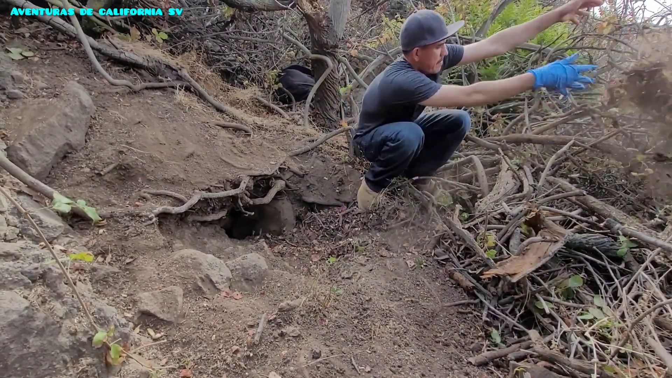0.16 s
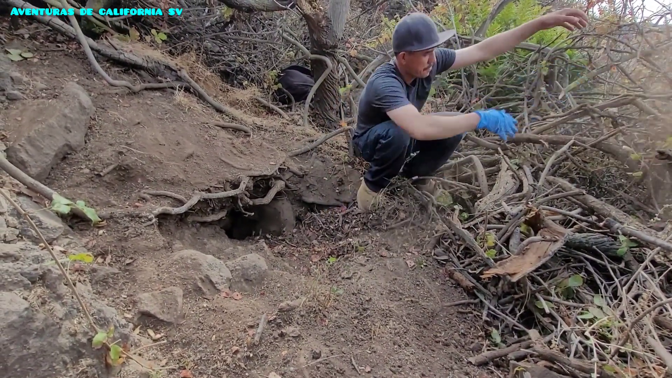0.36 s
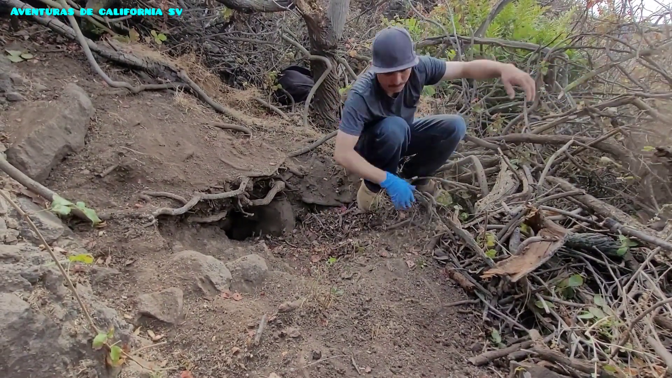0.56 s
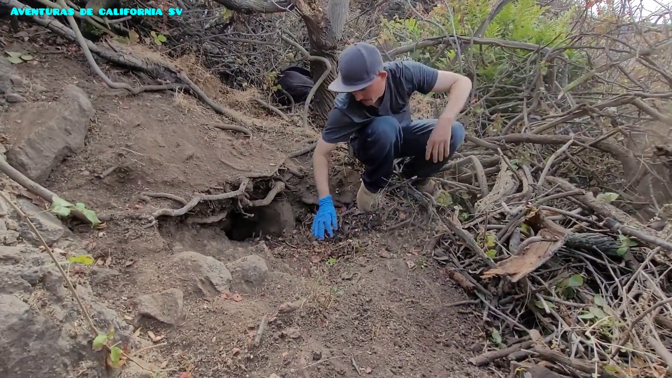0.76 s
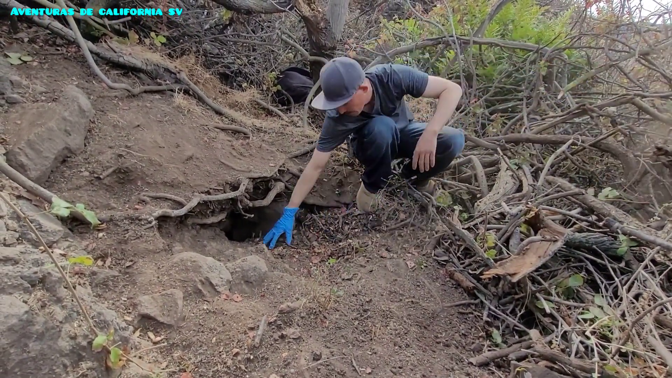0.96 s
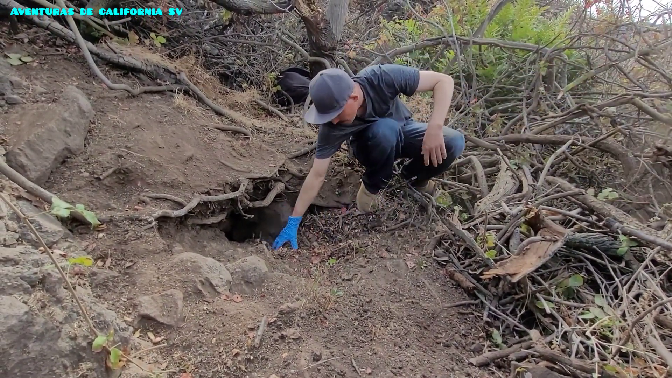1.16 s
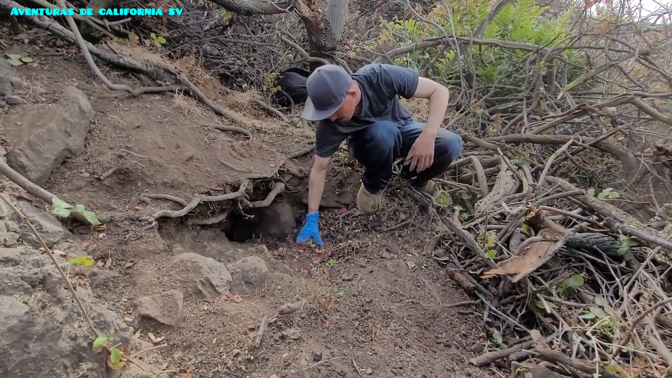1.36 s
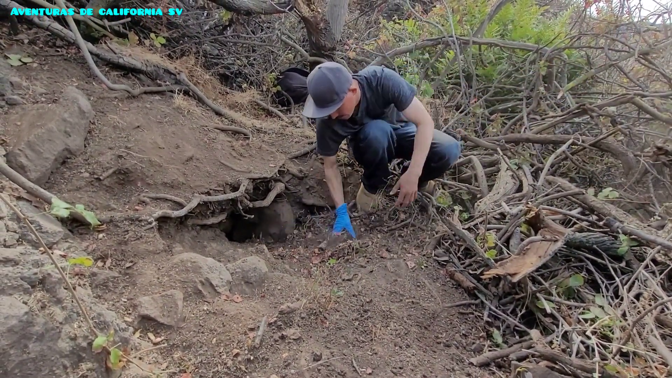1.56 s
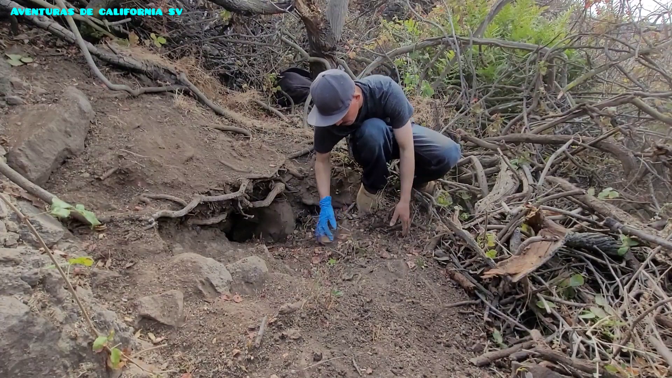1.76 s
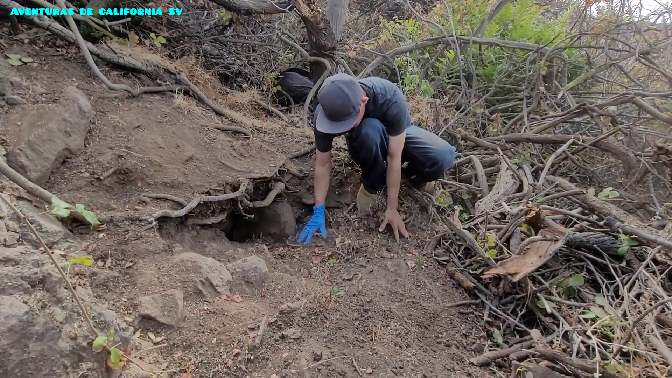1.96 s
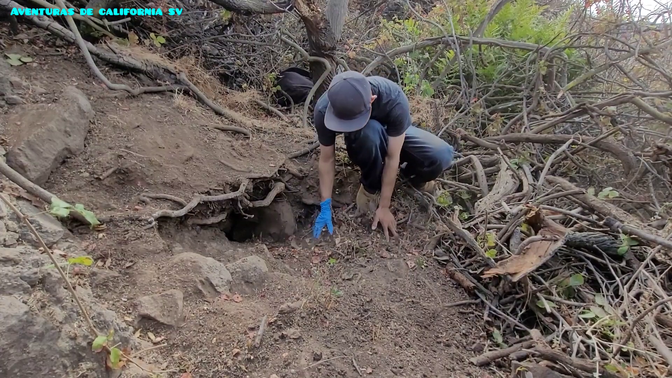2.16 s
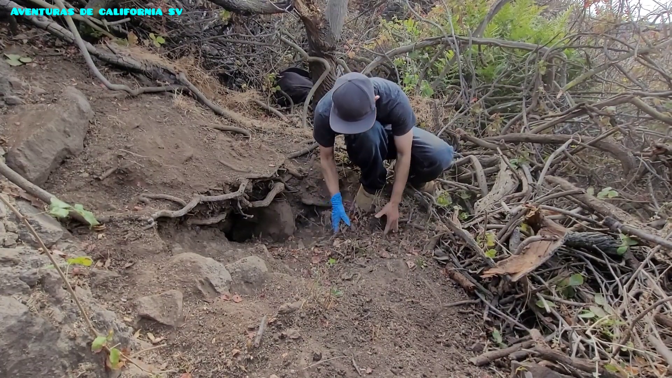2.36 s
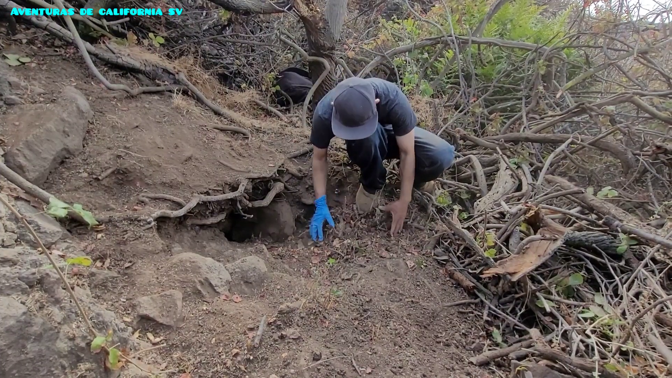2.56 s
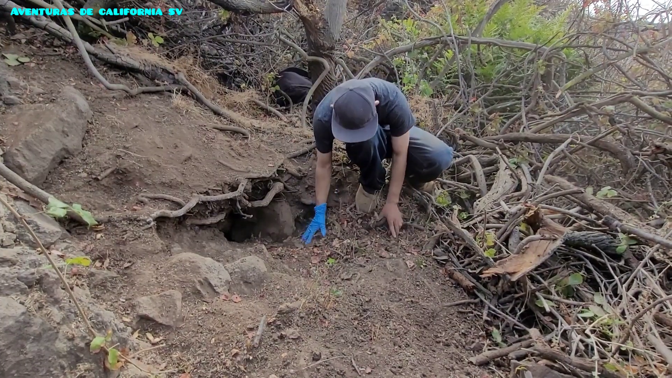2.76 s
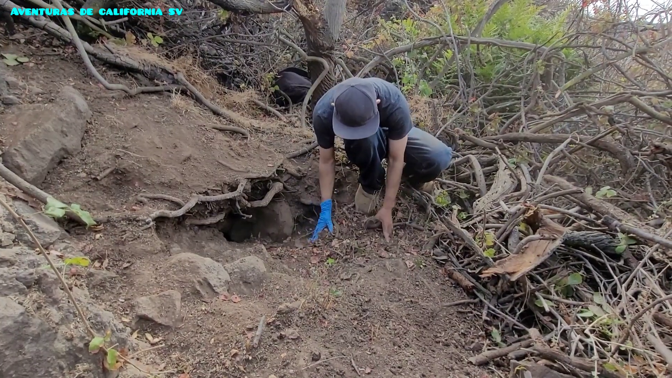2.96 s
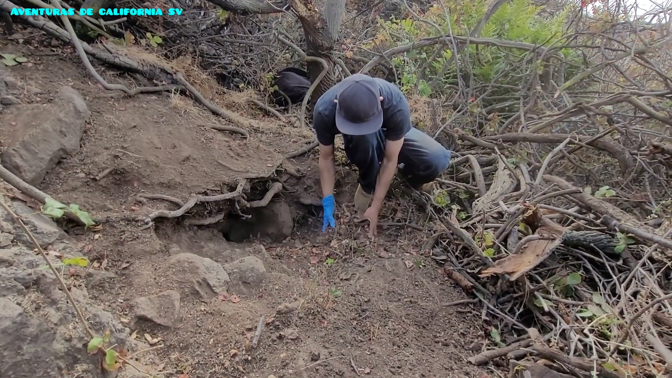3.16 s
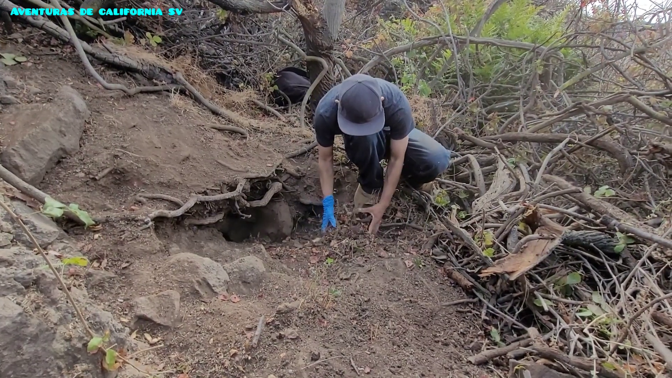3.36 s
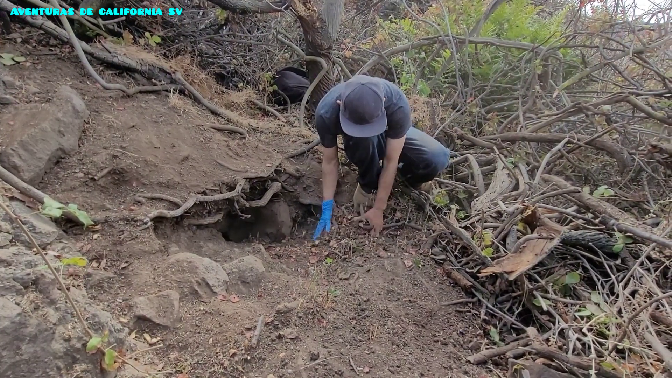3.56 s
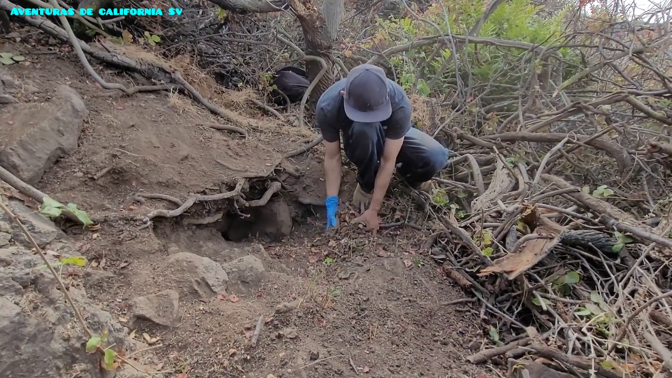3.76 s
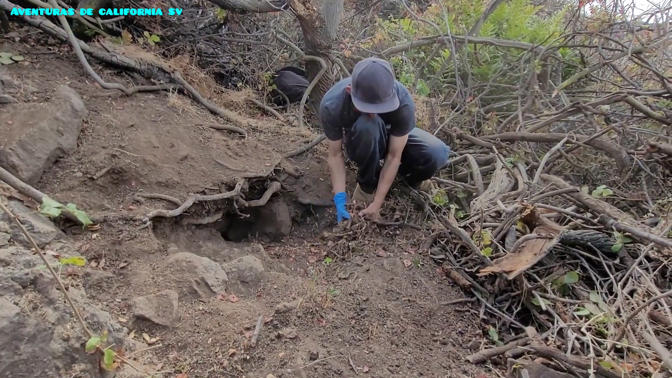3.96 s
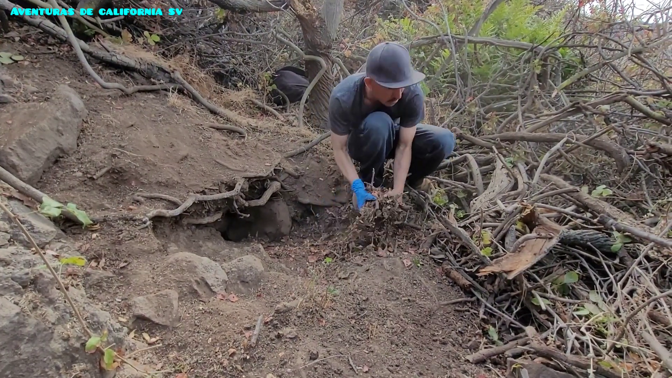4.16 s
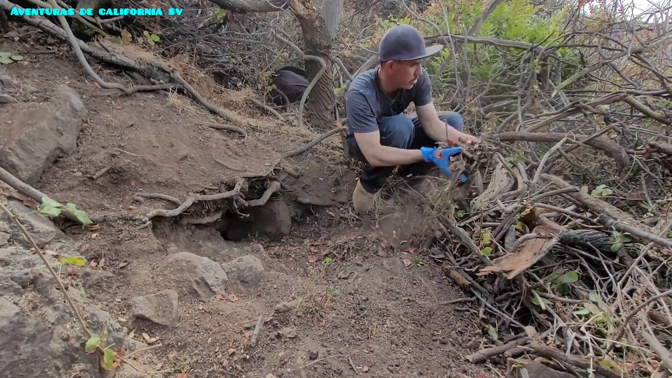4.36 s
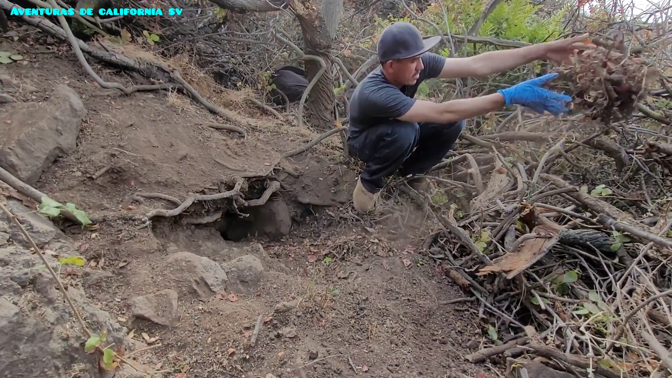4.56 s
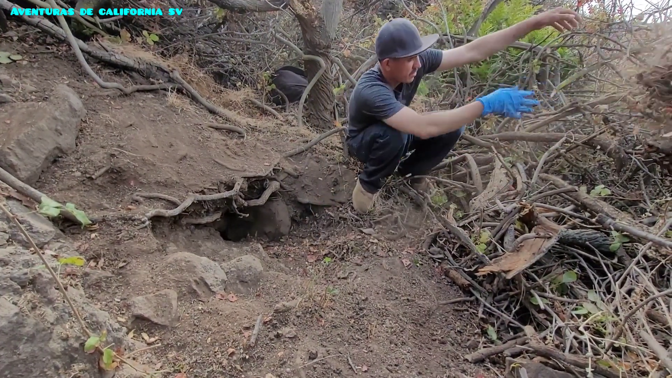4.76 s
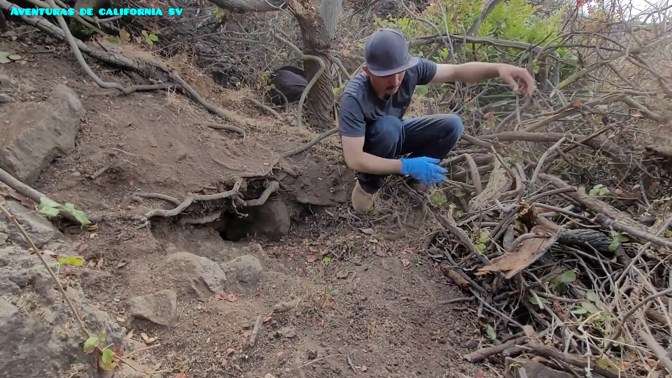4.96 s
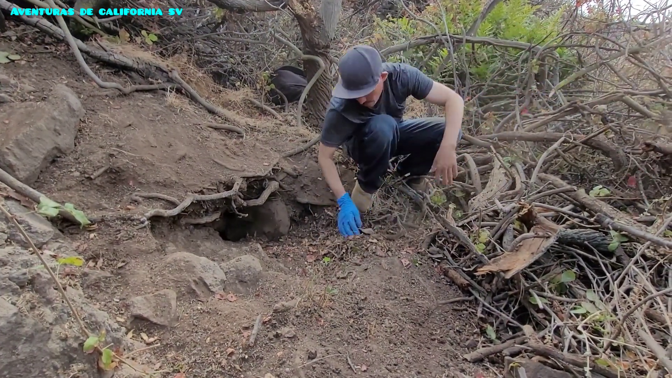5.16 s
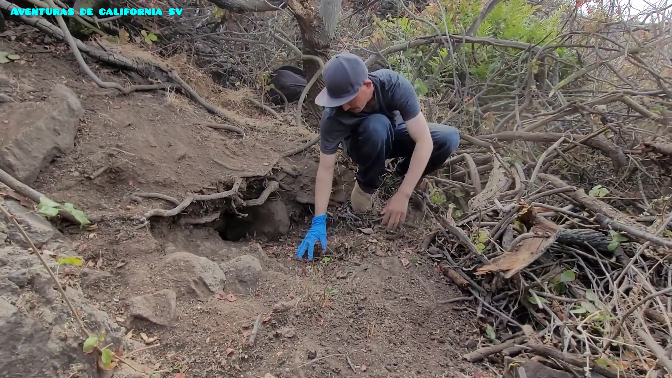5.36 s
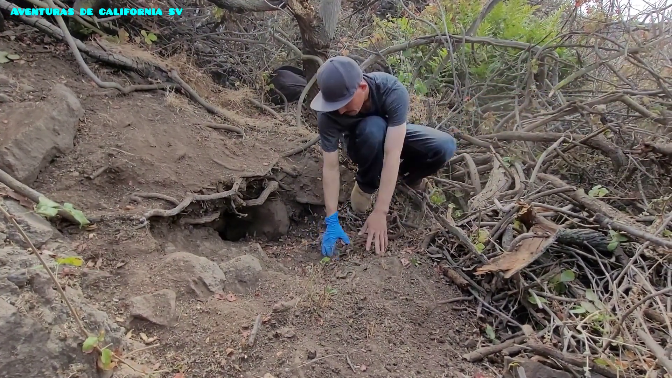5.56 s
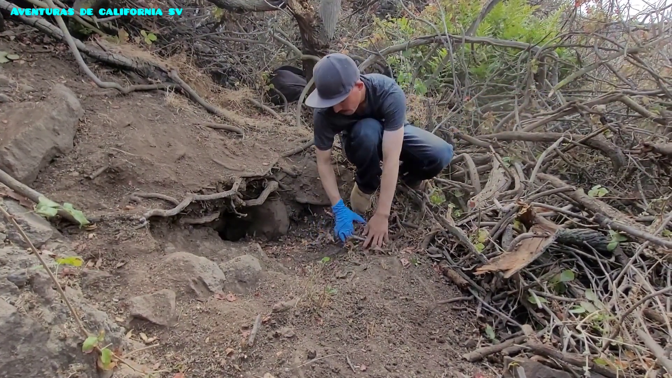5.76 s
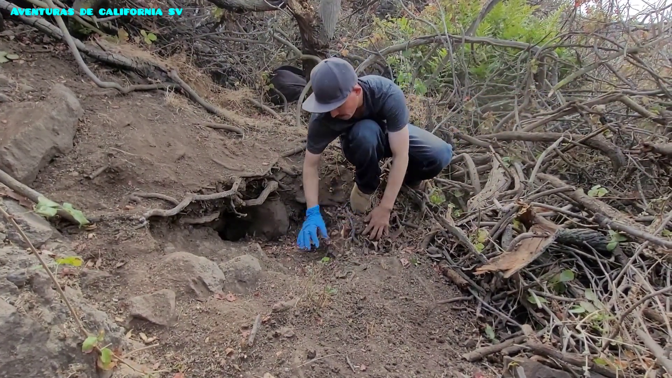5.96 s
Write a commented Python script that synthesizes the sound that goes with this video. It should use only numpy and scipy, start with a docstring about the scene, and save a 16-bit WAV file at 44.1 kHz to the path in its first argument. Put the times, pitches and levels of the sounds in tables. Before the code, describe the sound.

Dirt and crumbs hit dry branches on the right with a hollow clod knock and a fading patter. Hands then rake crunchy leaf litter near the centre in uneven bursts, twigs cracking brightly and soil bumping dully under the palms. Another toss rattles into the sticks late on, followed by more scraping. The microphone is fairly near, in open, dry surroundings with soft air and a very faint low drone.

```python
"""Dirt patters on the right as a handful lands on a brush pile: pebbles tick, clods knock, a trickle thins out.
Then hands rake leaves and dirt near the middle: grainy noise scrapes, snaps are bursts with short clicks.
Dull decaying sines bump as the soil gives way, and a second handful lands on the pile near the end.
Behind it all, shaped noise is the outdoor air and a wavering low sine is a far engine."""
import sys
import numpy as np
from scipy import signal
from scipy.fft import rfft, irfft, next_fast_len
from scipy.io import wavfile
from scipy.ndimage import uniform_filter1d, map_coordinates

SR = 44100
rng = np.random.default_rng(int(sys.argv[2]) if len(sys.argv) > 2 else 0)


def inscribe(sig):
    """Save sig as 16-bit PCM at rate SR to the path in sys.argv[1].

    A 1-D sig is mono; a 2-D sig holds one channel per row.
    Samples are clipped to [-1, 1] before scaling.
    """
    pcm = np.round(np.clip(np.atleast_2d(sig).T, -1, 1) * 32767)
    wavfile.write(sys.argv[1], SR, pcm.astype(np.int16))


N = 265482

# In every table, level_db is relative: the mix gains in the code come on top.

# gritty soil under the fingers: [freq_hz, level_db]
GROUND_COLOUR = [(40, -32), (230, -10), (400, -16), (600, -3), (850, -5.5), (1100, 0), (2000, -2),
                 (3600, -1.5), (5200, -.5), (6400, -3.5), (7800, -0.5), (8900, -6.5), (12300, -0.6),
                 (15500, -3.5)]
# soil rubbed by the palms: [freq_hz, level_db]
PALM_COLOUR = [(40, -13), (100, -2.5), (150, -6), (240, 3), (340, -7), (500, -2), (1000, -25), (3000, -58)]
# left-right likeness of sounds at the hands: [freq_hz, correlation]
HANDS_ALIKE = [(250, 0.84), (600, 0.67), (850, 0.31), (1300, 0.06), (1900, 0.86), (3000, 0.39), (5000, 0.1),
               (8000, -0.12), (13000, 0.0028)]


def scraping():
    """Fingers drag crumbs, grit and leaf litter while the palms rub the soil beneath."""
    scrape_gain, palm_gain = stroke_gains()
    litter = patchy(grains(rate=700, scatter_db=4.0, life=0.0013, bed=1.0), depth_db=1.23)
    grit = patchy(grains(rate=2400, scatter_db=2.5, life=0.0013, bed=0.71), depth_db=3.0)
    litter, grit = rustle(litter, grit, GROUND_COLOUR, HANDS_ALIKE, split_hz=5360)
    catching = amp(0.68 * wobble(55))  # the fingers catch and slip
    rub = spread(grains(rate=92, scatter_db=5.0, life=0.011, bed=0.94), HANDS_ALIKE)
    rub = unit(coloured(rub, PALM_COLOUR))
    fingers = catching * scrape_gain * (amp(-1.5) * litter + amp(6) * grit)
    palms = amp(0.5) * palm_gain * rub
    return (fingers + palms) * amp([[.3], [-.3]])  # a touch louder on the left


# strokes of the hands over the ground: [start_s, length_s, scrape_level_db, palm_level_db]
HAND_STROKES = [(1.355, .08, -55, -63.5), (1.466, 0.12, -47.5, -57.5), (1.624, .05, -56.5, -71),
                (1.71, 0.077, -64.5, -74.5), (1.84, 0.039, -58, -73), (1.946, 0.01, -53, -62.5),
                (2.033, 0.04, -52, -71), (2.084, 0.075, -52.5, -60.5), (2.279, 0.12, -51, -61.5),
                (2.59, .05, -61, -76), (2.712, .04, -58, -71.5), (2.983, 0.049, -53.5, -63),
                (3.089, .10, -50, -61), (3.3, 0.3, -63.5, -83.5), (3.628, 0.043, -60, -90),
                (3.693, 0.047, -53.5, -63.5), (3.871, 0.067, -51, -70.5), (4.017, 0.048, -52.5, -72),
                (4.098, 0.058, -57.5, -74), (4.223, 0.16, -55, -78), (4.468, 0.084, -52, -82),
                (4.934, 0.19, -54.5, -63), (5.485, 0.23, -54.5, -67), (5.793, 0.068, -53.5, -71),
                (5.92, .1, -56.5, -70.5)]
STROKE_RISE_S, STROKE_FALL_S = 0.097, 0.082  # per 20 dB
STROKE_THINS_DB_PER_S = 0.5
RESTING_DB = -65  # litter stirring under the hands between strokes


def stroke_gains():
    """Every stroke swells, holds and dies alike: gains of the fingers and of the palms."""
    shapes = [swell(start, length, STROKE_RISE_S, STROKE_FALL_S, STROKE_THINS_DB_PER_S)
              for start, length, _, _ in HAND_STROKES]
    _, _, scrape_db, palm_db = np.transpose(HAND_STROKES)[:, :, None]
    scrape = together(amp(scrape_db) * shapes)
    return np.hypot(scrape, amp(RESTING_DB)), together(amp(palm_db) * shapes)


# twigs and leaf stalks breaking under the fingers: [start_s, level_db, centre_hz]
TWIG_SNAPS = [(1.4641, -30, 5270), (1.581, -26.5, 7800), (1.9473, -33, 9200), (2.0908, -29, 10100),
              (2.3508, -16, 11500), (2.403, -30, 8850), (2.7135, -32.5, 12300), (3.089, -21.5, 12500),
              (3.1834, -27, 7700), (3.307, -35, 7050), (3.69, -27, 12700), (3.9509, -19.5, 12300),
              (4.0166, -31.5, 5270), (4.2108, -30, 4940), (4.4967, -33, 5230)]


def snaps():
    """A stalk breaks with a bright crack, scattered briefly by the ground around it."""
    out = np.zeros((2, N))
    for start, db, hz in TWIG_SNAPS:
        colour = [(hz / 25, -22), (hz / 3, -7), (hz, 0), (hz * 2, -6)]
        scatter = burst(colour, HANDS_ALIKE, t60=.024, crack_db=11, crack_t60=0.0012)
        snap = amp(db - 13.5) * scatter + amp(db - 10) * click(hz, cycles=7.9)
        add(out, start + .0007, snap)
    return out


# soft weight on the soil, from a palm or a heap of dirt: [start_s, level_db, pitch_hz]
SOIL_PRESSES = [(1.411, -44.5, 153), (1.499, -49, 131), (2.13, -57, 190), (3.19, -44.5, 252),
                (4.911, -45, 217), (5.191, -45, 215)]


def presses(rise=0.0036, t60=0.073):
    """Loose soil gives way with a dull bump, a sine that rises fast and decays."""
    out, t = np.zeros((2, N)), np.arange(SR // 5) / SR
    for start, db, hz in SOIL_PRESSES:
        bump = np.sin(2 * np.pi * hz * t) * (1 - np.exp(-t / rise)) * amp(db + 1 - 60 * t / t60)
        add(out, start, np.array([bump, bump]))
    return out


PILE_LAG_S = 0.000364  # the left ear hears the pile this much later than the right


def brush_pile():
    """The pile lies to the right: later and a little softer on the left."""
    delay = lambda hz: np.exp(1j * np.pi * hz * PILE_LAG_S * np.array([[-1], [1]]))
    return filtered(shower() + strikes(), delay) * amp([[-.7], [.7]])


# debris falling through the brush: [freq_hz, level_db]
BRUSH_COLOUR = [(40, -30), (150, -11), (230, -6), (340, -11), (520, -4.5), (780, -1.5), (1150, -2.5),
                (1700, -0.5), (3800, 0), (5500, -2.5), (7900, -3), (8800, -9), (12300, -3.5), (15500, -7.5)]
# left-right likeness of sounds at the pile: [freq_hz, correlation]
BRUSH_ALIKE = [(150, 0.99), (350, 0.33), (800, 0.95), (1400, 0.78), (2500, 0.26), (4500, 0.06),
               (14000, 0.087)]


def shower():
    """Coarse leaves and crumbs patter through the branches; fine dirt hisses on after them."""
    crumb_gain, dirt_gain = fall_gains()
    patter = patchy(grains(rate=820, scatter_db=5.5, life=0.0029, bed=1.0), depth_db=2)
    hiss = patchy(grains(rate=2900, scatter_db=-1.0, life=0.0011, bed=0.64), depth_db=1.25)
    patter, hiss = rustle(patter, hiss, BRUSH_COLOUR, BRUSH_ALIKE, split_hz=5760)
    crackle = spread(grains(rate=240, scatter_db=2.0, life=0.00013, bed=0), BRUSH_ALIKE)
    crackle = unit(coloured(crackle, BRUSH_COLOUR))
    # the heavier the fall, the stronger the crackle of dry leaves within it
    crackle *= np.sqrt(crumb_gain / crumb_gain.max())
    crumbs = crumb_gain * (amp(-2.0) * patter + amp(-11) * crackle)
    return crumbs + amp(-1.5) * dirt_gain * hiss


# stray dirt spilling from a handful in flight: [start_s, length_s, level_db]
DIRT_SPILLS = [(0, 0.283, -46), (0.265, 0.1, -41), (4.578, 0.26, -51), (4.867, 0.043, -38)]
SPILL_CRUMBS_DB, SPILL_EDGE_S = -10.5, 0.042  # few crumbs among the dirt; rise and fall per 20 dB
# handfuls thrown onto the pile: [bulk_start_s, rise_s per 20 dB, bulk_length_s,
# bulk_level_db, trickle_level_db, trickle_length_s]
HANDFULS = [(0.389, 0.12, 0.081, -38, -43, 0.93), (4.925, 0.0665, 0.13, -37.5, -43.5, 0.9)]
BULK_FALL_S, TRICKLE_FALL_S = 0.11, 0.88  # per 20 dB
DIRT_DB, DIRT_LATE_S = 4.5, 0.015  # fine dirt relative to crumbs in the bulk; it flies slower
TRICKLE_DIRT_DB, TRICKLE_THINS_DB_PER_S = 3.5, 4.5


def fall_gains():
    """Spilt dirt, the bulk and a thinning trickle: gains of the crumbs and of the dirt."""
    crumbs, dirt = [], []
    for start, length, db in DIRT_SPILLS:
        spill = amp(db) * swell(start, length, SPILL_EDGE_S, SPILL_EDGE_S)
        crumbs.append(amp(SPILL_CRUMBS_DB) * spill)
        dirt.append(spill)
    for start, rise, length, db, trickle_db, lasts in HANDFULS:
        crumbs.append(amp(db) * swell(start, length, rise, BULK_FALL_S))
        late_bulk = swell(start + DIRT_LATE_S, length - DIRT_LATE_S, rise, BULK_FALL_S)
        dirt.append(amp(db + DIRT_DB) * late_bulk)
        trickle = amp(trickle_db) * swell(start, lasts, rise, TRICKLE_FALL_S, TRICKLE_THINS_DB_PER_S)
        crumbs.append(trickle)
        dirt.append(amp(TRICKLE_DIRT_DB) * trickle)
    return together(crumbs), together(dirt)


# pebbles and sticks striking dry branches: [start_s, level_db, centre_hz]
BRANCH_TICKS = [(0.0388, -32.5, 5540), (.083, -32.5, 7060), (0.0976, -33.5, 4430), (0.128, -31.5, 3000),
                (0.2018, -25.5, 5450), (0.3303, -28.5, 4150), (.3569, -27, 2540), (0.4603, -26.5, 2500),
                (4.506, -34, 1800), (4.5882, -38, 3700), (4.7402, -36.5, 4380), (4.812, -30.5, 4770),
                (4.818, -31.5, 1630), (4.853, -38.5, 2640), (4.864, -21.5, 12200), (4.896, -21.5, 5400),
                (4.9408, -26, 2600), (4.955, -24.5, 4770), (4.969, -21, 2940), (4.976, -18, 2020),
                (5.3135, -30.5, 1600), (5.345, -29, 3680)]
# clods landing on the pile: [start_s, level_db, crumbling_t60_s]
CLOD_LANDINGS = [(0.129, -42, .038), (.158, -39, 0.068), (.276, -27.5, 0.034), (.358, -37, 0.19),
                 (0.387, -26, .06), (.393, -16, 0.044), (.475, -40.5, 0.31), (0.546, -40, 0.11),
                 (4.506, -50, 0.056), (4.913, -35, 0.044), (4.941, -36, .051), (5.188, -37.5, .087),
                 (5.314, -33, .041)]


def strikes():
    """Pebbles tick on single branches; clods knock the whole pile."""
    out = np.zeros((2, N))
    for start, db, hz in list(BRANCH_TICKS) + stray_bits():
        branch = [(hz / 12, -34), (hz / 2, -14), (hz, 0), (hz * 1.35, -9), (hz * 4, -22)]
        ring = burst(branch, BRUSH_ALIKE, t60=0.037, crack_db=-11.0, crack_t60=0.0038)
        add(out, start + .0007, amp(db - 7) * ring + amp(db - 14) * click(hz, cycles=3.5))
    for start, db, t60 in CLOD_LANDINGS:
        add(out, start + 0.00097, amp(db - 4.0) * knock(t60))
    return out


BITS_PER_S, BIT_HZ = 70, 3900  # average rate; centre pitch, scattered an octave either way
BIT_DB, BIT_RANGE_DB = 3, 5  # least level over the spill, and random extra


def stray_bits(count=40):
    """Grains of each spill hit branches at random: rows of start_s, level_db, centre_hz."""
    bits = []
    for start, length, db in DIRT_SPILLS:
        waits, sizes, pitches = rng.random((count, 3)).T
        ages = np.cumsum(2 * waits / BITS_PER_S)
        for age, size, pitch in zip(ages, sizes, pitches):
            if age < length:
                hz = BIT_HZ * 2 ** (2 * pitch - 1)
                bits.append((start + age, db + BIT_DB + BIT_RANGE_DB * size, hz))
    return bits


# resonances of the stick pile under a clod: [freq_hz, level_db, t60_s]
STICK_MODES = [(237, -17, 0.11), (497.5, -11, 0.078), (651, 1, 0.015), (745, -0.5, 0.048),
               (1030, -2, 0.075), (1580, -4, 0.045)]
# a clod crumbling: [freq_hz, level_db]
CLOD_COLOUR = [(40, -18), (130, -11.5), (300, -8), (700, 14), (1100, -0.5), (1600, -5), (5000, -18),
               (12000, -42)]


def knock(t60):
    """A clod sets the sticks ringing, a little differently each time, and crumbles."""
    t = np.arange(SR // 5) / SR
    hz, db, life = np.transpose(STICK_MODES)[:, :, None]
    detune, strength = rng.standard_normal((2, len(hz), 1))
    sign = (-1) ** np.arange(len(hz))[:, None]
    decay = amp(db + 2.4 * strength - 60 * t / life)
    modes = sign * decay * np.sin(2 * np.pi * hz * (1 + 0.016 * detune) * t)
    crumbling = burst(CLOD_COLOUR, BRUSH_ALIKE, t60, crack_db=4.5, crack_t60=0.018)
    return modes.sum(0) * amp(-3.5) + amp(-9) * crumbling


# outdoor air: [freq_hz, level_db]
AIR_COLOUR = [(25, -25), (50, 8.5), (90, -1.5), (150, -7), (330, -13.5), (600, -9), (1500, -21),
              (3000, -30), (5000, -6), (7600, -7.5), (9200, -19), (12300, -7.5), (15500, -17)]


def outdoors(drone_hz=65.8, drone_db=-71.5, air_db=-64):
    """Soft air as shaped noise, and a far engine as a sine wavering in phase and level."""
    phase = 2 * np.pi * drone_hz * np.arange(N) / SR + 1.1 * wobble(11)
    drone = unit(np.sin(phase) * (1 + 0.21 * wobble(30)))
    air = noise(AIR_COLOUR, [(30, 0.31), (90, 0.94), (400, 0.18), (2000, 0.08)])
    return amp(drone_db) * drone + amp(air_db) * air


def grains(rate, scatter_db, life, bed):
    """Tiny contacts of unequal size, each a noise burst decaying over life s, on a steady bed of noise."""
    sizes = amp(scatter_db * np.minimum(rng.standard_normal(N), 2.5))
    contacts = (rng.random(N) < rate / SR) * sizes ** 2
    power = signal.lfilter([1], [1, -np.exp(-1 / (life * SR))], contacts)
    return np.sqrt(power / power.mean() + bed) * rng.standard_normal((2, N))


def patchy(pair, depth_db):
    """Ever new leaves and stalks are touched: the colour shifts in patches of time and frequency."""
    z = signal.stft(pair, nperseg=512)[2]
    field = uniform_filter1d(rng.standard_normal(z.shape[1:]), size=5, axis=0)
    field = uniform_filter1d(field, size=7, axis=1)
    return signal.istft(z * amp(depth_db * unit(field)), nperseg=512)[1][:, :N]


def rustle(coarse, fine, spectrum, alike, split_hz):
    """Coarse debris sounds below split_hz and fine debris above it, each in stereo at rms 1."""
    low = lambda hz: 1 / (1 + (hz / split_hz) ** 4)
    colour = lambda hz: amp(along(spectrum, hz))
    below = filtered(spread(coarse, alike), lambda hz: colour(hz) * np.sqrt(low(hz)))
    above = filtered(spread(fine, alike), lambda hz: colour(hz) * np.sqrt(1 - low(hz)))
    return unit(below), unit(above)


def burst(spectrum, alike, t60, crack_db, crack_t60):
    """One blow: a first crack and a noisy ring, each dying away at its own rate."""
    t = np.arange(SR // 5) / SR
    decay = amp(-60 * t / max(t60, .002)) + amp(crack_db - 60 * t / crack_t60)
    sound = noise(spectrum, alike, size=len(t)) * decay * (1 - np.exp(-t / .0001))
    return unit(sound) * np.sqrt(np.mean(decay ** 2))


def click(hz, cycles):
    """The instant of a dry fracture or hard contact: a ring of very few cycles."""
    age = np.arange(SR // 5) * hz / SR
    return np.sin(2 * np.pi * age) * np.exp(-age / cycles)


def swell(start, length, rise, fall, thins_db=0):
    """Rise up to start, hold (losing thins_db a second) and fall; rise and fall are s per 20 dB."""
    age = np.arange(N) / SR - start
    edges = np.maximum(-age, 0) / rise + np.maximum(age - length, 0) / fall
    return amp(-20 * edges - thins_db * np.maximum(age, 0))


def together(gains):
    """Unrelated noises add up in power."""
    return np.sqrt(np.sum(np.square(gains), axis=0))


def wobble(rate):
    """A smooth random curve, rate knots a second."""
    return map_coordinates(rng.standard_normal(int(N * rate / SR) + 4), [np.arange(N) * rate / SR])


def noise(spectrum, alike, size=N):
    """Coloured stereo noise of rms 1."""
    return unit(coloured(spread(rng.standard_normal((2, size)), alike), spectrum))


def spread(pair, alike):
    """Mix two unrelated signals into left and right of the given likeness."""
    turn = lambda hz: np.arccos(np.clip(along(alike, hz), -1, 1)) / 2
    mid, side = filtered(pair, lambda hz: np.array([np.cos(turn(hz)), np.sin(turn(hz))]))
    return np.array([mid + side, mid - side])


def coloured(x, spectrum):
    """Shape x with a table of freq_hz and level_db."""
    return filtered(x, lambda hz: amp(along(spectrum, hz)))


def filtered(x, response):
    """Multiply the spectrum of x by a response of frequency."""
    n = x.shape[-1]
    m = next_fast_len(n + 8192)
    return irfft(rfft(x, m) * response(np.fft.rfftfreq(m, 1 / SR)), m)[..., :n]


def along(points, hz):
    """Read a table of freq_hz and value on a log frequency axis."""
    f, v = np.transpose(points)
    return np.interp(np.log(hz + 1), np.log(f + 1), v)


def amp(db):
    """Decibels to gain."""
    return 10 ** (np.asarray(db) / 20)


def unit(x):
    """Scale to rms 1."""
    return x / np.sqrt(np.mean(x ** 2) + 1e-20)


def add(track, s, sound):
    """Mix a sound into the track at time s."""
    part = track[:, max(round(s * SR), 0):][:, :sound.shape[1]]
    part += sound[:, :part.shape[1]]


def scene():
    """Hands near the middle, brush pile on the right, open air all round."""
    return scraping() + snaps() + presses() + brush_pile() + outdoors()


def record(dry):
    """Cut everything from 16 kHz upward."""
    return filtered(dry, lambda hz: hz < 16000)


dry = scene()
out = record(dry)
inscribe(out)
```